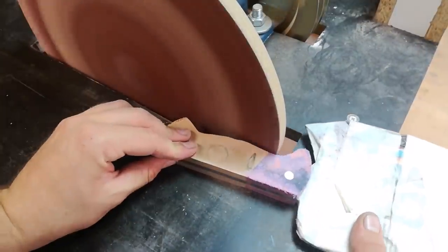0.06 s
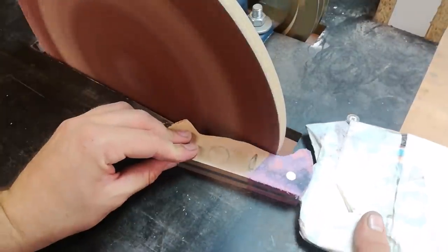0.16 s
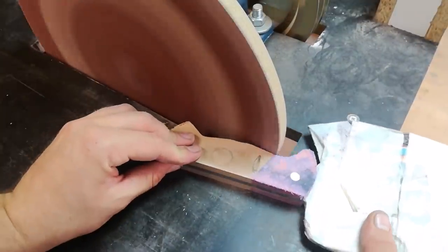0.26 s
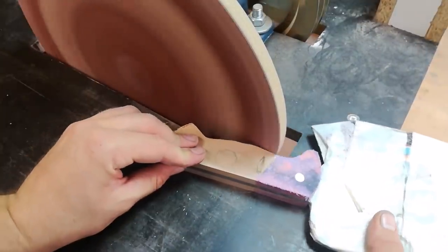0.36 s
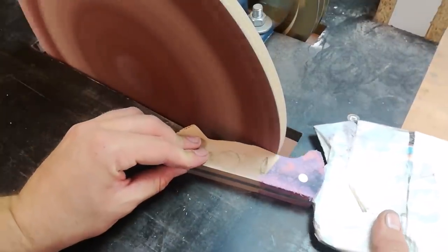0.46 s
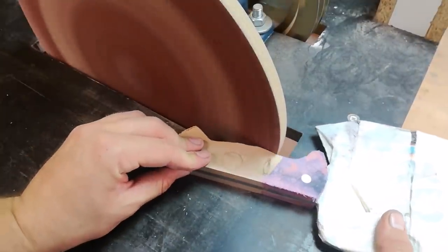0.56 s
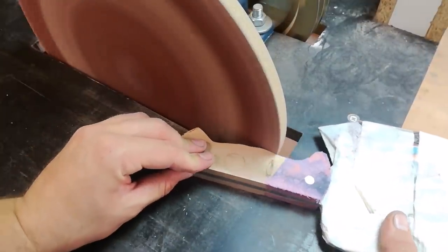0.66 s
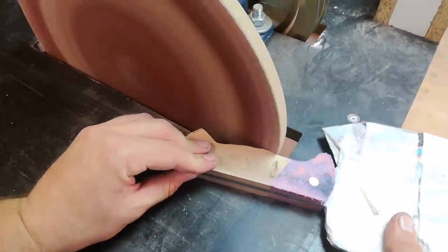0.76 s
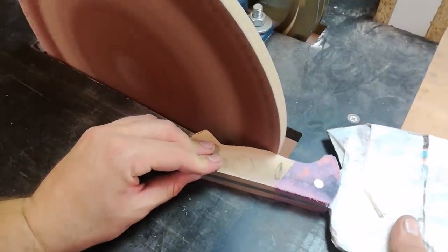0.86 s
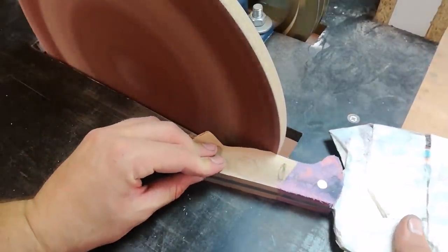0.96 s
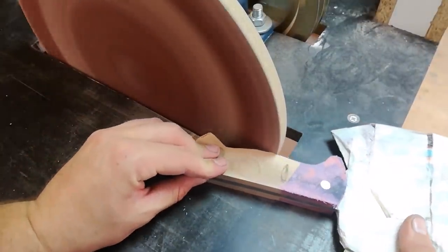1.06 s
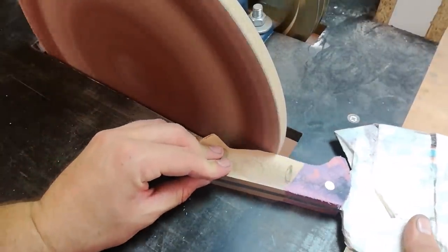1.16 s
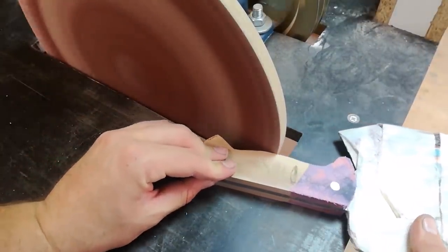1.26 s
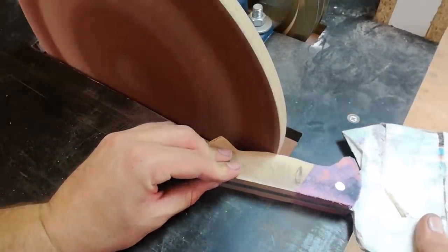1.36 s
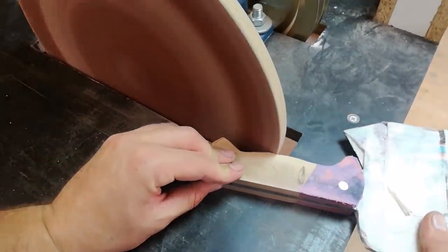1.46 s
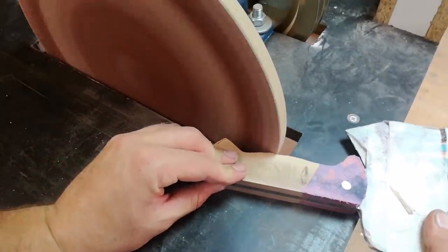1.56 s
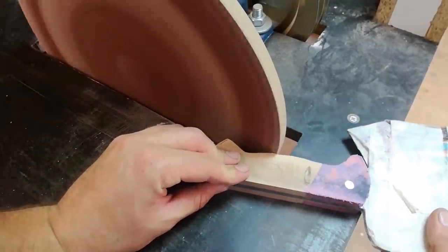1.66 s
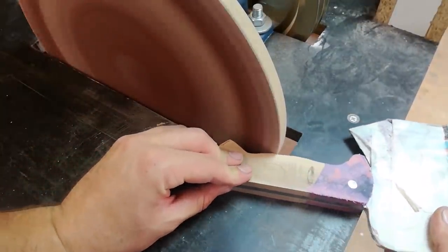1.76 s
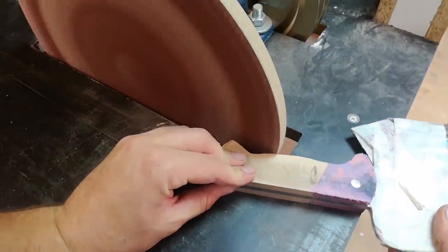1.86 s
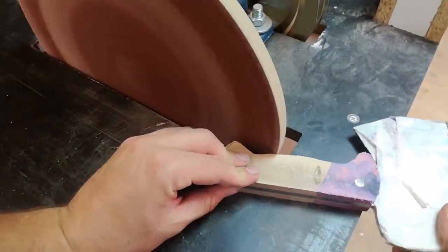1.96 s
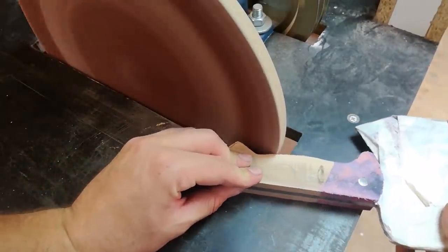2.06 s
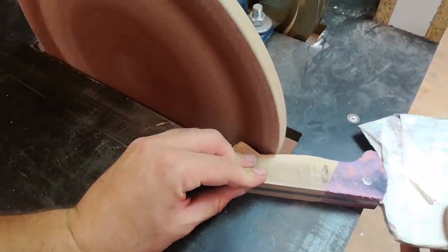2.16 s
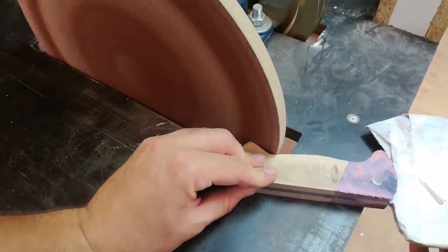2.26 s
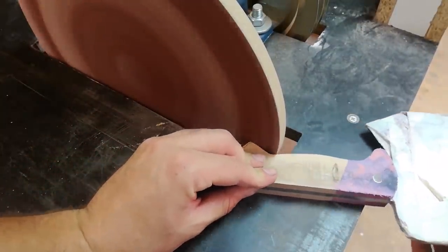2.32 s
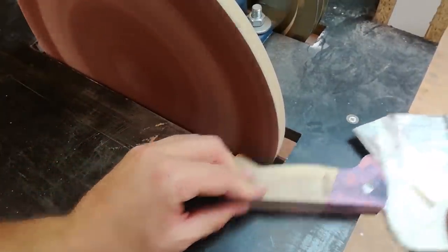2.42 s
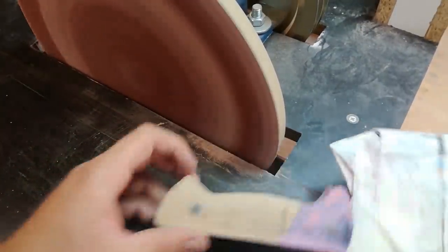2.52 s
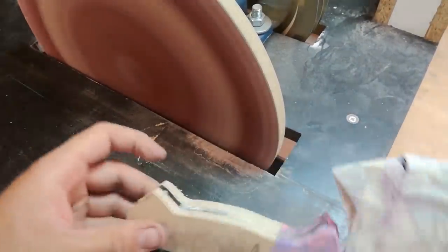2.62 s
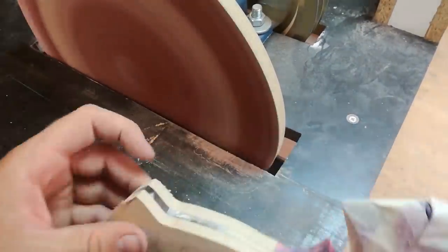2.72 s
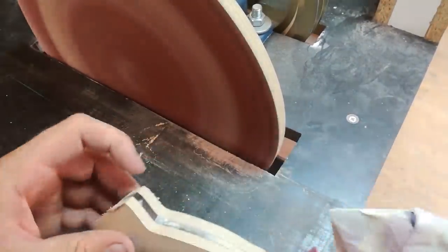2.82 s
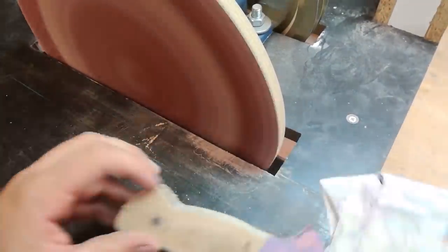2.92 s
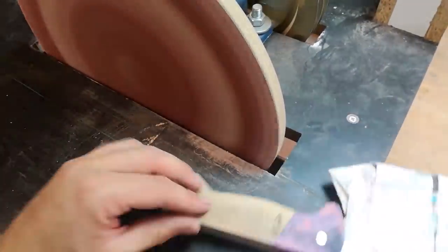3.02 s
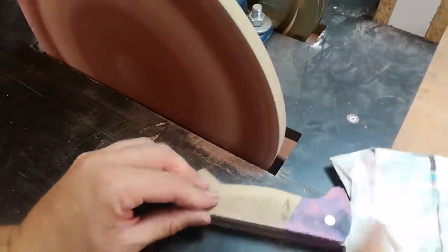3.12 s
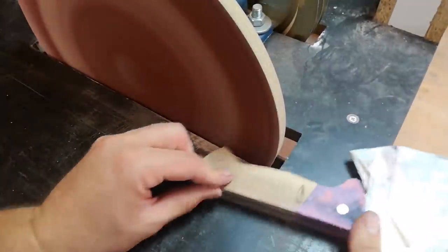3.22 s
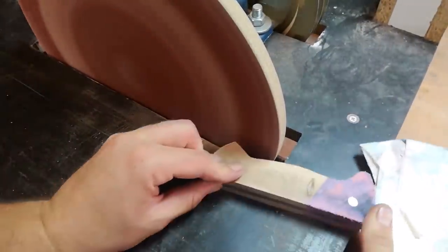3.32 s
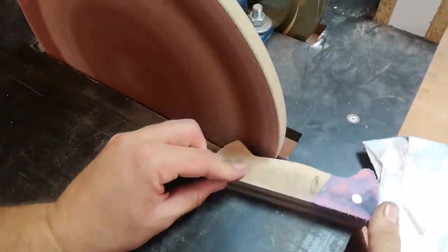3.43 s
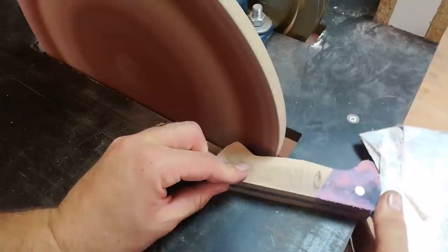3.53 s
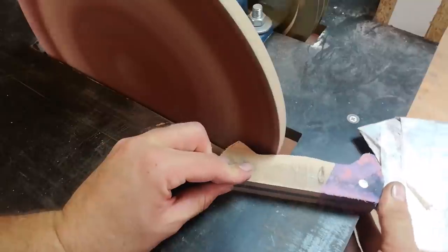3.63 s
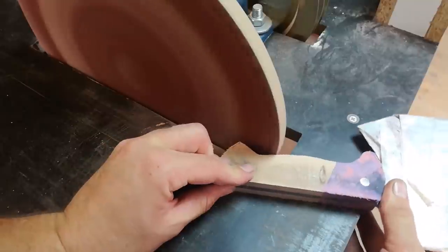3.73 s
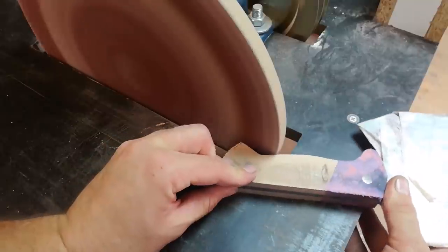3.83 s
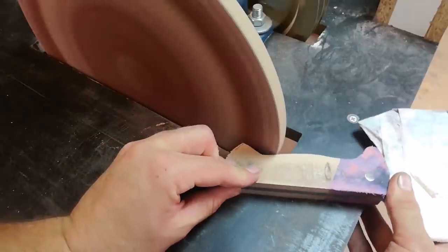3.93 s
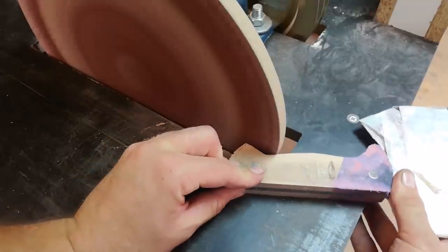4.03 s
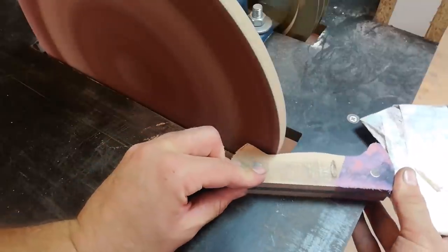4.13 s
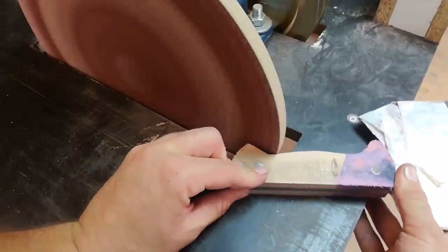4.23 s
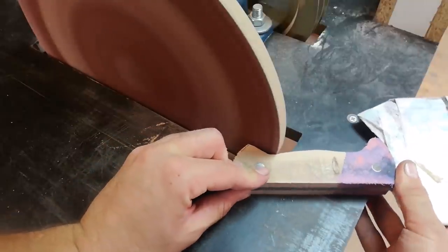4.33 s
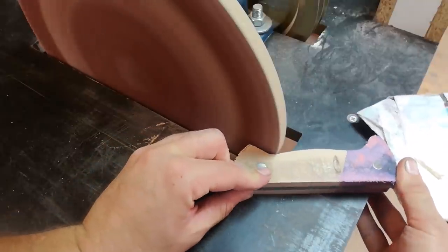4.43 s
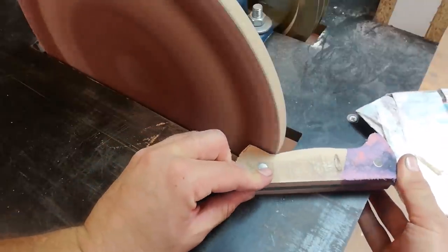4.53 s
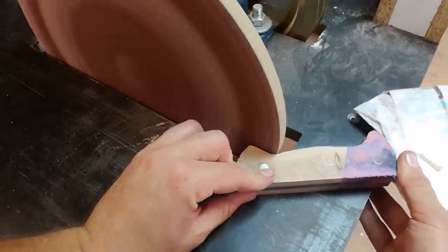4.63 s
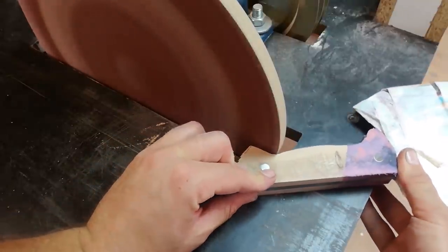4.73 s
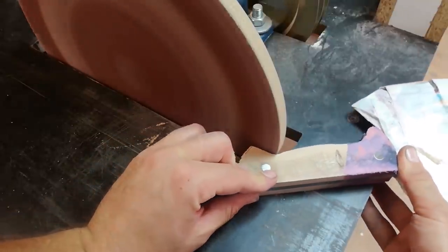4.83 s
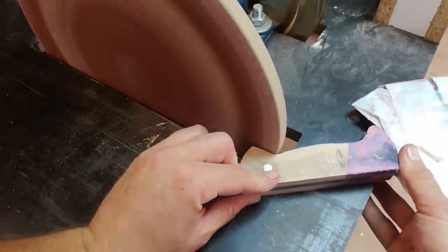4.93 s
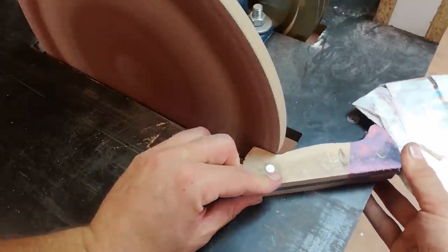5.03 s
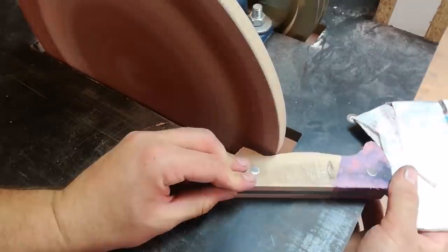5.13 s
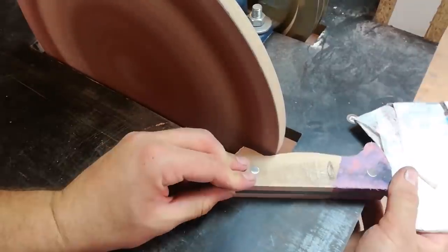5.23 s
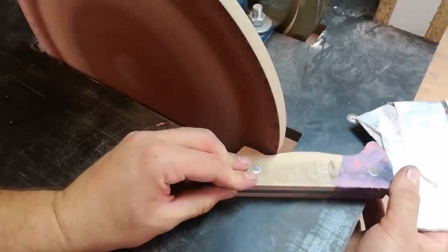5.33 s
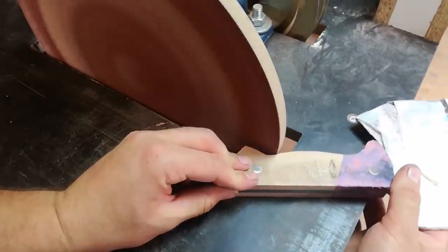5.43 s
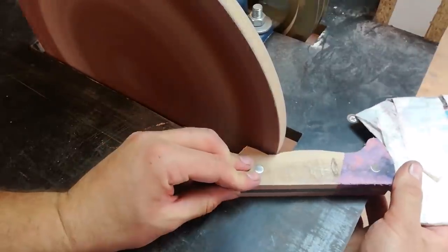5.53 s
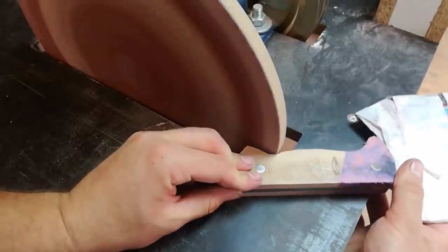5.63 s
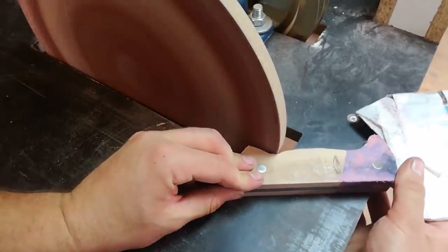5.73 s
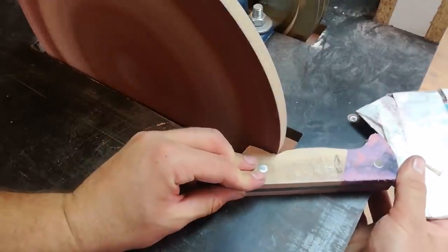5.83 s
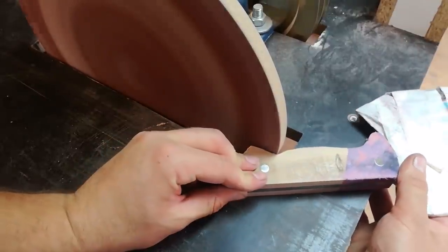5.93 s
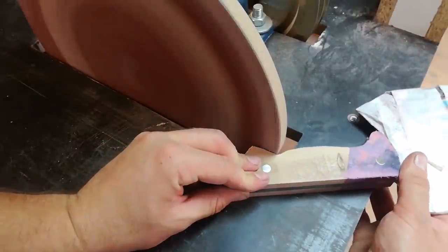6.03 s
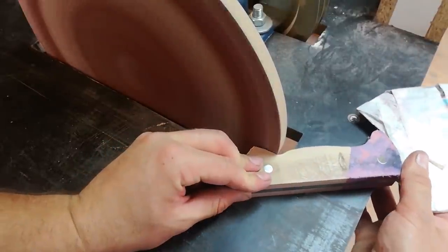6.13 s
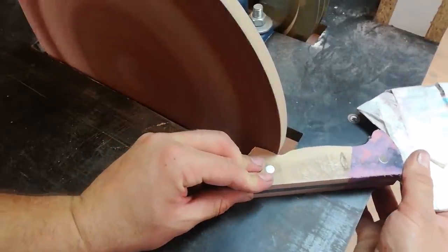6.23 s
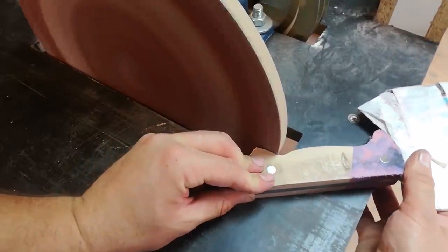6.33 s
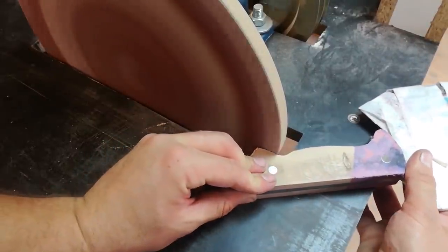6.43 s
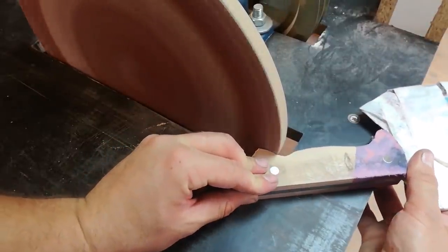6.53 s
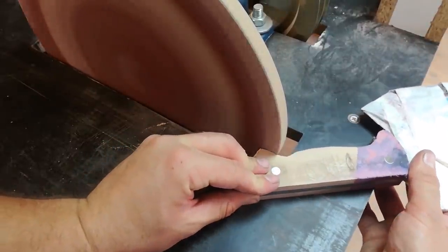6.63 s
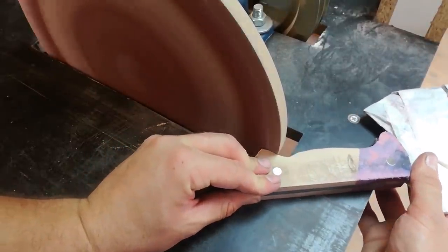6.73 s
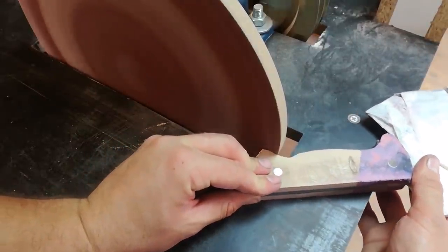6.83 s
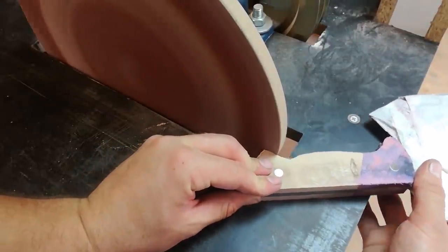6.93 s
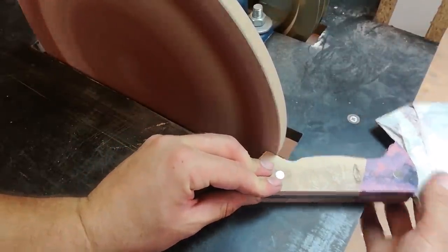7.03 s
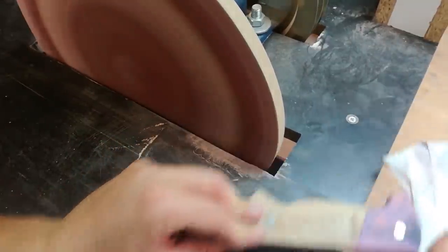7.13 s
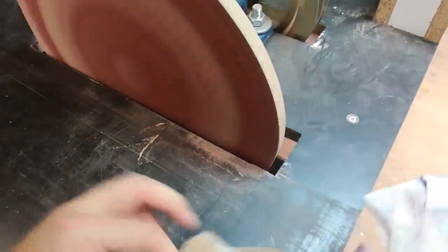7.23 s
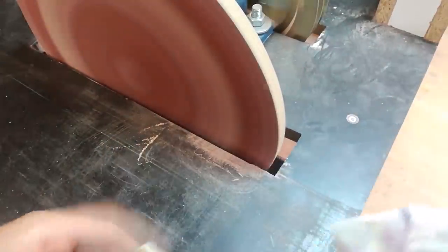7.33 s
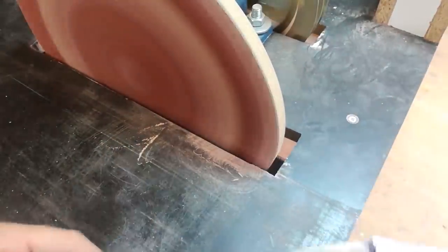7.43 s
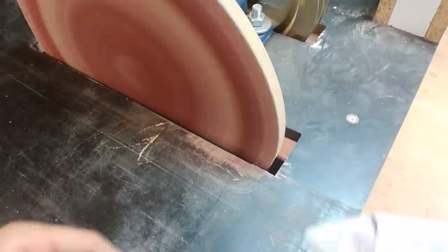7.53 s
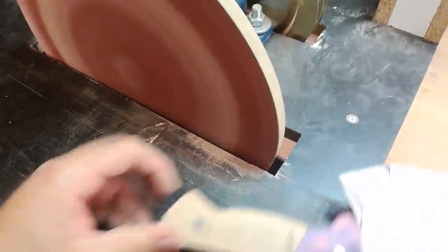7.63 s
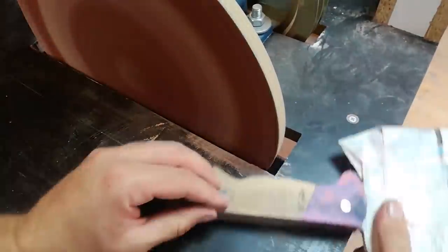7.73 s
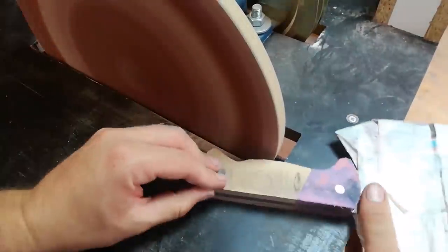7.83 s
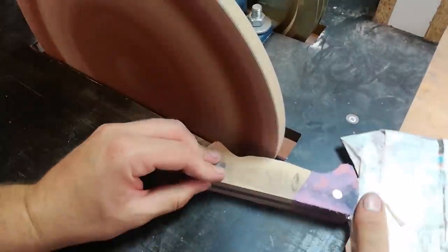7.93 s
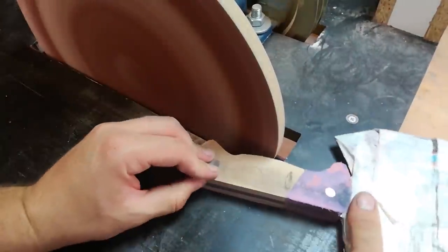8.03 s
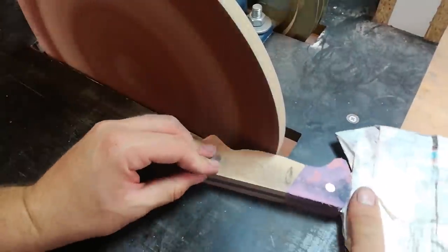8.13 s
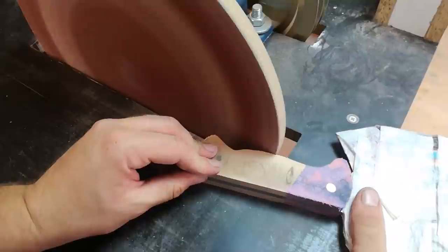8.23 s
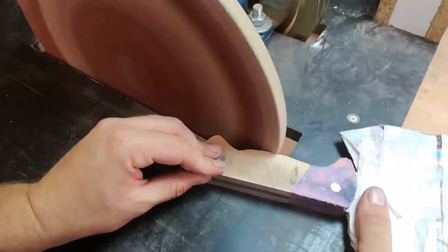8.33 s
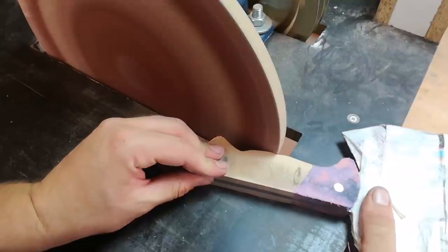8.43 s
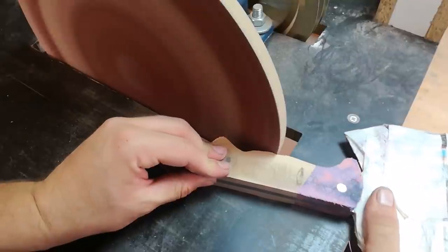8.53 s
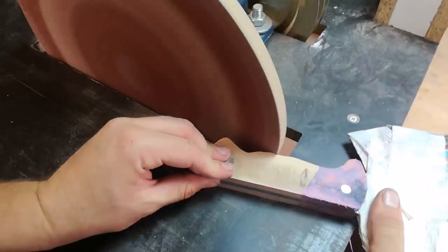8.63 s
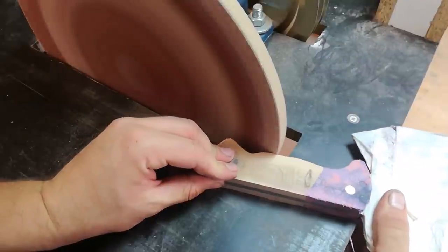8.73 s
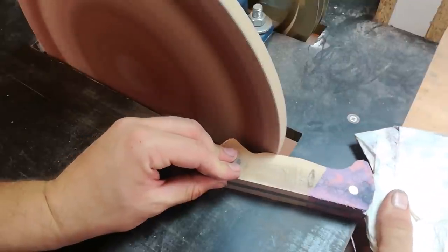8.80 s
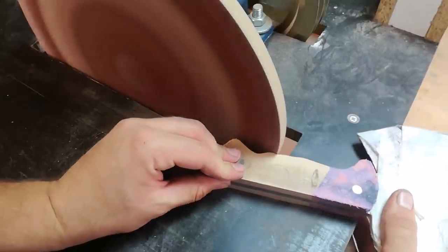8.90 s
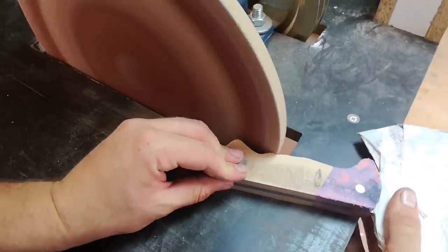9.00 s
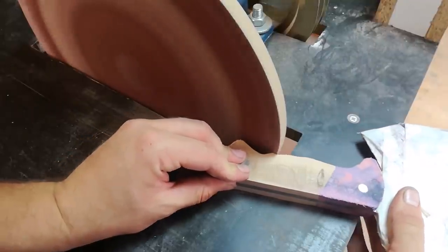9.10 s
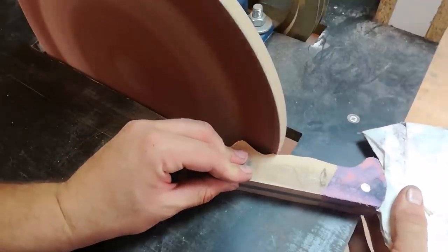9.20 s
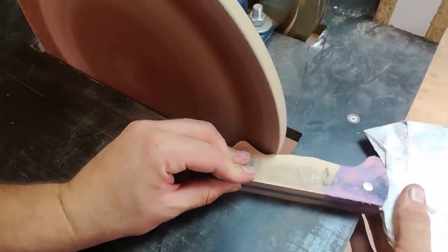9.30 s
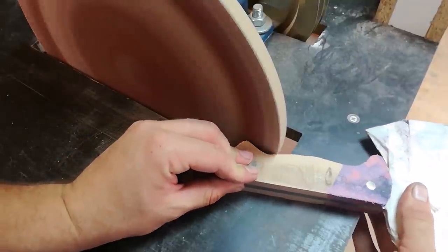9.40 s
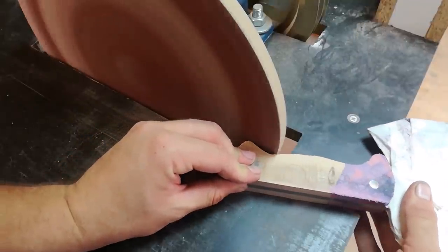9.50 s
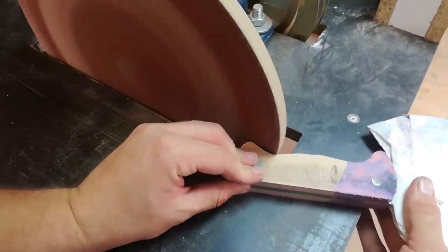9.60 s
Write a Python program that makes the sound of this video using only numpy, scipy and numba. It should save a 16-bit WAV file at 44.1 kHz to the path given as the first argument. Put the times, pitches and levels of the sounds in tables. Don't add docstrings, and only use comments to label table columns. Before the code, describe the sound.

Close workshop sanding: harsh abrasive hiss fluttering rapidly with the disc's turns, four presses on wood, light table knocks between, motor humming throughout.

```python
import sys
import numpy as np
from scipy import signal
from scipy.fft import rfft, irfft, next_fast_len
from scipy.io import wavfile
from numba import njit

SR = 44100
rng = np.random.default_rng(int(sys.argv[2]) if len(sys.argv) > 2 else 0)


def gain_from_db(level_db):
    decades = np.asarray(level_db, float) / 20
    return 10 ** decades


def generate_wav(signal):
    frames = np.transpose(np.atleast_2d(signal))
    scaled = np.clip(frames, -1, 1) * 32767
    pcm = np.round(scaled).astype(np.int16)
    wavfile.write(sys.argv[1], SR, pcm)


N = 426006
TIME = np.arange(N) / SR
SIZE = next_fast_len(N + 8192)
HZ = np.maximum(np.arange(SIZE // 2 + 1) * SR / SIZE, 1)
LOG_HZ = np.log(HZ)
LEFT_LAG_S = 14 / SR
LEFT_LAG = np.exp(-2j * np.pi * HZ * LEFT_LAG_S)
SMALL_BODY = np.minimum(HZ / 330, 1) ** 5
SCENE_CHANGE_S = 5.203

# (from [s], to [s])
PASSES = [
    (0.05, 2.4),
    (3.6, 5.09),
    (5.26, 7.08),
    (8.1, 9.7),
]
# (time [s], pressure on the disc [dB], seating on the table [dB])
HANDS = [
    [(.05, -16, -32), (.095, 0.5, 4), (.135, -14, -15), (.16, -2.5, -1), (.28, -1, 0.5), (1.67, -0.5, -1),
     (2.2, -1.5, -3), (2.34, -8.5, -2), (2.4, -16, -13)],
    [(3.6, -11, -33), (3.73, -0.5, -7), (3.9, -7, -5.5), (4.1, -9, -7.5), (4.26, -0.5, -8.5),
     (4.64, -3.5, -7.5), (4.8, -1.5, -8), (5.06, -5.5, -9), (5.09, -26, -9)],
    [(5.26, -18, -19), (5.4, -12, -20), (5.55, -7.5, -11.5), (5.72, 1, -7.5), (6.1, 2.5, -6),
     (6.57, 3, -4.5), (6.82, 1.5, -6), (7.02, 4, -7), (7.08, -15, 5)],
    [(8.1, -23, -11), (8.13, -16, -22), (8.215, -12, -16), (8.235, -1, -1), (8.3, 2.5, -1), (8.62, 4.5, 4),
     (9.35, 3.5, -1), (9.66, 3.5, -2.5)],
]
CREEP = [(.06, -.11, -.52, -.51), (-.05, .04, .4, .42), (.1, .27, -.08, -.46), (-.05, -.04, .54, .45)]
# (frequency [Hz], level [dB per Hz])
HISS = [(2470, -36), (4200, -5.5), (4510, -8.5), (5730, -8), (7640, -2.5), (8680, -4), (10800, -7.5),
        (15100, -11), (15800, -23)]
# (frequency [Hz], level [dB])
SHADOW = [(60, -6), (180, 9), (550, -2.5), (1650, -6.5), (4970, -7.5), (15000, -20)]
# (frequency [Hz], common share [0-1])
LIKENESS = [(60, 0.57), (450, 0.79), (1000, 0.85), (2300, 0.25), (5800, 0.15), (7200, 0.37), (8800, 0.14),
            (15000, 0.15)]


def rms_one(x):
    return x / np.sqrt(np.mean(np.mean(np.atleast_2d(x), axis=0) ** 2) + 1e-20)


def in_time(rows):
    s, *columns = np.transpose(rows)
    return [np.interp(TIME, s, c) for c in columns]


def by_pass(starts, ends=None):
    ends = starts if ends is None else ends
    return np.interp(TIME, np.ravel(PASSES), np.ravel(np.transpose([starts, ends])))


def spells(rows, attack_s, release_s):
    return [np.clip(np.minimum((TIME - a) / attack_s + 1, (b - TIME) / release_s + 1), 0, 1)
            for a, b, *rest in rows]


def song(rows):
    shapes = spells(rows, attack_s=0.23, release_s=0.1)
    return sum(gain_from_db(row[2]) * shape ** 2 for row, shape in zip(rows, shapes))


def at_hz(points):
    hz, value = np.transpose(points)
    return np.interp(LOG_HZ, np.log(hz), value)


def boosts(table):
    return gain_from_db(sum(db / (1 + (2 * (HZ - hz) / width) ** 2) for hz, width, db in table))


def resonance(hz, width_hz):
    return 1 / (1 + 1j * (HZ ** 2 - hz ** 2) / (HZ * width_hz))


def modes(table):
    return sum((-1) ** k * gain_from_db(db) * resonance(hz, width) for k, (hz, width, db) in enumerate(table))


def band(low_hz, high_hz, x):
    return signal.sosfilt(signal.butter(2, [low_hz, high_hz], "band", fs=SR, output="sos"), x)


@njit
def sweep(x, hz, width_hz, sr):
    out = np.zeros_like(x)
    r = np.exp(-np.pi * width_hz / sr)
    for c in range(x.shape[0]):
        for i in range(2, x.shape[1]):
            push = (1 - r * r) / 2 * (x[c, i] - x[c, i - 2])
            swing = 2 * r * np.cos(2 * np.pi * hz[i] / sr) * out[c, i - 1]
            out[c, i] = push + swing - r * r * out[c, i - 2]
    return out


def heard(pair, response, likeness=LIKENESS, shadow=SHADOW):
    # (frequency [Hz], width [Hz], boost [dB])
    left_port = [(3160, 750, 2.5), (4400, 720, -4.5), (6100, 700, 2.5), (7300, 600, -2.5), (8500, 920, 3),
                 (9500, 300, -5), (1820, 400, 1)]
    near, other = rfft(pair, SIZE) * response
    alike = np.clip(at_hz(likeness), 0, 1)
    left = alike * near * LEFT_LAG + np.sqrt(1 - alike ** 2) * other
    left = left * gain_from_db(at_hz(shadow)) * boosts(left_port)
    return rms_one(irfft([left, near], SIZE)[:, :N])


def motor():
    # (time [s], level [dB])
    drift = [(0, -51.5), (2.4, -52.5), (5.15, -51.5), (5.24, -52.5), (7.1, -48.5), (9.66, -46.5)]
    # (frequency [Hz], level [dB per Hz])
    fan_noise = [(35, -33), (60, -36), (91, -48), (329, -10.5), (361, -19.5), (436, -4.5), (590, -10),
                 (985, -14.5), (2230, -12.5), (4700, -19), (9460, -14.5), (15800, -25)]
    # (frequency [Hz], width [Hz], boost [dB])
    fan_peaks = [(9470, 410, 6), (5600, 2900, 5.5), (527, 31, -6.5), (103.4, 58, 22.5), (150, 39, 6.5),
                 (4100, 2200, -5.5), (3016, 52, 6.5), (8160, 1040, -4), (10870, 510, -5), (1900, 310, 1.5),
                 (3570, 120, -6), (4530, 180, -2)]
    # (frequency [Hz], level [dB])
    fan_shadow = [(60, 6.5), (180, -2.5), (550, -1), (1650, -4), (4970, -2.5), (15000, -13.5)]
    # (frequency [Hz], common share [0-1])
    fan_likeness = [(60, 0.5), (400, 1), (1500, 0.32), (4500, 0.073), (8000, 0.074), (15000, .05)]
    # (frequency [Hz], level before [dB], after the scene changes [dB])
    hum_lines = [(100, -82, -85), (200, -79, -78), (499.6, -65, -64), (599.3, -69, -69), (699, -66, -64),
                 (800, -73, -72), (1857, -77, -80), (1999, -79, -79), (2316, -77, -80), (2616, -81, -83),
                 (2995, -76, -79), (3122, -80, -83), (4904, -83, -85), (5147, -81, -84), (5589, -81, -84),
                 (6982, -81, -84), (6190, -79, -74), (7508, -80, -76)]
    # (from [s], to [s], level [dB], frequency [Hz])
    resting = [(2.44, 2.9, -61, 599.3), (11, 4.1, -74, 499.6), (6.4, 7.7, -61.5, 602),
               (7.8, 8.2, -54.5, 496), (5.7, 8.6, -76, 100)]
    level_db, = in_time(drift)
    colour = gain_from_db(at_hz(fan_noise)) * boosts(fan_peaks)
    fan = heard(rng.standard_normal((2, N)), colour, fan_likeness, fan_shadow)

    waver = np.interp(TIME * 25, np.arange(250), rng.standard_normal(250))
    hum = np.zeros((2, N))
    for k, (hz, first_db, second_db) in enumerate(hum_lines):
        line_db = np.where(TIME < SCENE_CHANGE_S, first_db, second_db) + 3.5 * np.roll(waver, 9000 * k)
        start_turns = rng.random((2, 1)) * 0.39
        hum += np.sqrt(2) * gain_from_db(line_db) * np.sin(2 * np.pi * (hz * TIME + start_turns))
    passed = sum(np.sqrt(2) * song([row]) * gain_from_db(2.5 * waver) * np.sin(2 * np.pi * row[3] * TIME)
                 for row in resting)

    away_s = abs(TIME - SCENE_CHANGE_S)
    fan_fade = np.clip(away_s / 0.028, .01, 1) ** 3.1
    hum_fade = np.clip(away_s / .035, 0, 1)
    return fan_fade * gain_from_db(level_db) * fan + hum_fade * hum + passed


def knocks():
    # (time [s], peak [dB])
    set_down = [
        (3.011, -30.5),
        (7.723, -23),
    ]
    # (frequency [Hz], level [dB], time to fall 60 dB [s])
    table_modes = [(342, -30, 0.13), (374, -6.5, 0.14), (457, -9, 0.12), (597, -19, 0.035), (745, -11, .05),
                   (872, -2, 0.1), (1047, -15, 0.098), (1890, -7, .06), (2030, -12, 0.08),
                   (2120, -19, 0.05), (2730, -18, 0.081)]
    out = np.zeros(N)
    for hz, level_db, t60 in table_modes:
        r, w = gain_from_db(-60 / (min(t60, .1) * SR)), 2 * np.pi * hz / SR
        blows = np.full(N, 1e-18)
        for s, db in set_down:
            contact_db = np.array([-3, 0, -7]) + rng.normal(0, 0.63, 3)
            blows[round(s * SR) + np.array([0, 90, 310])] = gain_from_db(db + level_db - 13.5 + contact_db)
        out += signal.lfilter([0, np.sin(w)], [1, -2 * r * np.cos(w), r * r], blows)
    thud = sum(gain_from_db(db - 12.0) * (TIME > s) * np.exp(-np.clip(TIME - s, 0, 1) / 0.0063)
               for s, db in set_down)
    dense_wood = band(250.0, 1600.0, band(220.0, 1500.0, rng.standard_normal(N)))
    out += thud * rms_one(dense_wood)
    out = signal.sosfilt(signal.butter(2, 280., "high", fs=SR, output="sos"), out)
    return np.array([gain_from_db(4.0) * np.roll(out, round(LEFT_LAG_S * SR)), gain_from_db(8.5) * out])


def disc_turns():
    # (time [s], speed [turns per s])
    spin = [(0, 27.73), (2.5, 27.83), (5.2, 27.74), (8.0, 27.77), (9.7, 27.77)]
    s, speed = np.transpose(spin)
    return np.interp(TIME, s, np.concatenate([[0], np.cumsum(np.diff(s) * speed[:-1])]))


def scuffs():
    # (time [s], peak [dB])
    touches = [(0.056, -29.5), (0.0743, -25), (0.127, -24.5), (2.043, -19), (3.6142, -39), (5.2808, -35),
               (5.3178, -39), (5.3544, -37), (5.4251, -38), (6.826, -22.5), (8.122, -25.5), (8.158, -25.5),
               (8.194, -33), (4.7925, -26), (4.834, -27), (2.25, -29), (5.677, -37), (4.971, -28),
               (8.224, -23)]
    # (frequency [Hz], width [Hz], level [dB])
    tick_modes = [(9380, 170, 12), (8560, 150, 3), (7020, 260, 6)]
    starts = np.full(N, 1e-18)
    starts[[round(s * SR) for s, db in touches]] = gain_from_db(np.array(touches)[:, 1] - 9)
    burst = signal.lfilter([1], [1, -np.exp(-1 / (0.0045 * SR))], starts)
    noise = rng.standard_normal((2, N))
    hiss = SMALL_BODY * gain_from_db(at_hz(HISS))
    bright = 1.5 * abs(resonance(8300, 1500))
    body = 0.05 * SMALL_BODY * abs(resonance(2500, 4000))
    glance = heard(noise, hiss + bright + body)

    tick_db = -37.5 + 2.6 * np.minimum(in_time(HANDS[1])[0] + 2.3, 0)
    away = (disc_turns() - 0.51 + .5) % 1 - .5
    spit = gain_from_db(tick_db + 3.0) * np.exp(-(away / 0.051) ** 2) * (TIME > 3.62) * (TIME < 4.85)
    click = (np.diff(away, prepend=0) > 0) * (abs(away) < 14 / SR)
    strike = spit * (noise + 12.0 * click)
    return burst * glance + np.std(spit) * heard(strike, 0.51 * hiss + modes(tick_modes))


def surface(turns, count, memory):
    keep = np.clip(memory, 0, .99)
    fresh = rng.standard_normal((2, int(turns[-1]) + 41, count))
    rings = signal.lfilter([np.sqrt(1 - keep ** 2)], [1, -keep], fresh, axis=1)
    rings = rings[:, 40:].reshape(2, -1)
    return np.array([np.interp(turns * count, np.arange(ring.size), ring) for ring in rings])


def grit(turns, memory, fresh_share):
    return surface(turns, count=800, memory=memory) + fresh_share * rng.standard_normal((2, N))


def paper_bands(turns):
    # (from [s], to [s], angle [turns], width [turns], level [dB])
    bands = [(0.13, 0.898, 0.54, 0.035, 2), (0.61, 1.65, 0.275, 0.0067, 4), (0.35, 1.6, 0.88, 0.047, 1.5),
             (0.27, 1.2, 0.9, 0.03, 2), (1.3, 2.2, 0.21, 0.014, -1), (1.6, 1.7, 1, 0.036, 1),
             (4, 4.848, 0.033, 0.014, 7), (4.25, 4.895, 0.22, 0.032, 5), (4.7, 4.7, 0.21, 0.064, 0.5),
             (5.3, 5.8, 0.816, 0.03, 4.5), (5.9, 6.8, 0.94, 0.029, 3.5), (6.198, 7.05, 0.53, 0.046, 0),
             (6.82, 6.986, 0.79, 0.076, 4), (5.65, 4.5, .5, 0.037, 0.5), (6.82, 7.0, 0.088, .07, -2),
             (8.246, 9.5, 0.61, 0.018, 1.5), (8.25, 9.5, 0.44, 0.02, -0.5), (8.25, 9.4, 0.345, 0.027, -2.5),
             (9.2, 9.4, 0.2, 0.016, 0), (12, 9.5, 0.77, 0.017, 3), (9.9, 9.3, 0.91, 0.043, 1.5),
             (5.9, 6.1, 0.94, 0.036, 0), (6.15, 6.85, 0.12, 0.056, 3.5), (6.1, 6.85, 0.92, .05, -2),
             (4.85, 5.08, 0.4, .06, 3), (4.85, 6.2, .58, .05, -3), (3.6, 3.5, .13, .016, -1),
             (4.4, 4.85, .42, .05, -3), (8.25, 8.5, .33, .03, 1.5), (8.9, 8.5, .6, .05, -2),
             (6.86, 8.1, 0.315, .025, 3.5)]
    # (from [s], to [s], angle [turns], fade [turns], level [dB])
    catch = (5.8, 6.09, .455, .13, 7.5)
    a, b, angle, fade, db = catch
    total_db = db * spells([catch], .15, .1)[0] * (np.exp(-((turns - angle) % 1) / fade) - fade)
    for (a, b, angle, width, db), shape in zip(bands, spells(bands, 0.078, 0.026)):
        away = (turns - angle + .5) % 1 - .5
        total_db = total_db + db * shape * np.exp(-(away / width) ** 2)
    return total_db


def throb(turns):
    # (time [s], angle [turns], depth [dB], twice-a-turn depth [dB])
    wobble = [(.1, -.5, 4.3, 2), (.55, -.71, 3.1, 1.7), (1.2, -.67, 3.5, 1), (1.8, -.67, .7, .9),
              (2.15, -.58, 3.2, 1), (3.65, .46, 5.5, 1.9), (3.85, .28, 2.6, .9), (4.05, .3, 3, 1.3),
              (4.45, .58, 1.2, 2.8), (4.68, .48, 1.4, 2.6), (4.85, .35, 5, .5), (5.1, .27, 3.4, .8),
              (5.45, -.25, 3.2, 1.5), (6.0, -.37, 6.2, .9), (6.6, -.5, 1.8, 2.1), (6.9, -.42, 3.6, 2.6),
              (8.33, -.57, 5.5, .9), (8.62, -.65, 3.1, 1.6)]
    spot, spot_db, second_db = in_time(wobble)
    second = by_pass(*np.transpose(CREEP)[:2])
    wobble_db = spot_db * np.cos(2 * np.pi * (turns - spot))
    wobble_db += second_db * np.cos(4 * np.pi * (turns - second))
    reach_db = np.hypot(spot_db, second_db)
    return reach_db * np.tanh(1.05 * wobble_db / reach_db) + paper_bands(turns)


def bench_rumble(turns):
    # (order [per turn], level [dB])
    rumble_orders = [(3, -9), (4, -2)]
    # (from [s], to [s], level [dB])
    rumble_spells = [(.3, 2.4, -70), (4.2, 5, -80), (5.8, 7.0, -64), (8.4, 11.2, -68)]
    shake = sum(gain_from_db(db) * np.sin(2 * np.pi * order * turns) for order, db in rumble_orders)
    loose = rms_one([[1, 0.19], [1, -.25]] @ band(89.0, 124.0, rng.standard_normal((2, N))))
    return song(rumble_spells) * rms_one(shake + .35 * loose)


def table_drone(turns, centre_hz):
    # (frequency [Hz], width [Hz], level [dB])
    loose_modes = [(304, 31, 13), (444, 25, 53)]
    widths = [28.4, 31.6, 31.2, 28]
    skirts = [-64, -30, -22.5, -56]
    wavers = [.7, 1.8, 2.5, 1.4]
    spot = by_pass(*np.transpose(CREEP)[2:])
    wander = np.concatenate([surface(turns, count=1, memory=0.68) for k in range(5)]) * by_pass(wavers)
    skirt, width = gain_from_db(by_pass(skirts)), by_pass(widths)
    orders = np.zeros(N)
    for k in range(11, 21):
        gain = np.exp(-((k * 27.53 - centre_hz) / width) ** 2) + skirt * (k < 17)
        angle = 2 * np.pi * (k * turns - (k - 17) * spot) + .08 * wander[20 - k]
        orders += gain * gain_from_db(wander[k - 11]) * np.cos(angle)
    tone = orders * gain_from_db(0.51 * surface(turns, count=2, memory=0.26)[0])
    colour = modes(loose_modes) * resonance(390, 460) * np.minimum(HZ / 290, 1) ** 6
    loose = heard(rng.standard_normal((2, N)), colour)
    return rms_one([np.roll(tone, round(LEFT_LAG_S * SR)), tone] + .16 * loose)


def grit_lines(turns):
    # (order [per turn], level over the rasp [dB])
    grit_orders = [(33, -11), (37, -12), (38, -13), (41, -12), (49, -14), (55, -16)]
    lines_db = [-0.5, -1, 0, 3.5]
    wander = np.concatenate([surface(turns, count=1, memory=0.8) for k in range(3)])
    tone = sum(gain_from_db(db + 3.3 * slow) * np.sin(2 * np.pi * order * turns + 0.37 * slow)
               for (order, db), slow in zip(grit_orders, wander))
    pair = np.array([gain_from_db(-4.0) * np.roll(tone, round(LEFT_LAG_S * SR)), tone])
    return gain_from_db(by_pass(lines_db) + 3.0) * pair


def rasp_and_scratch(fine, throb_db, ridges_db):
    # (frequency [Hz], width [Hz], boost [dB])
    wood = [(898, 31, 6.5), (1079, 120, 6.5), (1318, 45, 7.5), (1510, 60, 1), (1756, 82, 3.5),
            (1980, 140, 4.5), (2630, 170, -8), (2950, 100, -3), (3460, 190, 1.5), (3500, 120, 0.5),
            (4360, 120, -12), (4720, 150, -9)]
    # (frequency [Hz], level [dB per Hz])
    rasp_tone = [(310, -9.5), (520, 2.5), (635, -3.5), (890, 1), (1450, -2), (1990, -5.5), (2200, -4.5),
                 (2860, -9), (4840, -120)]
    # (frequency [Hz], level [dB per Hz])
    scratch_tone = [(1240, -19.5), (2100, -10), (2520, -3.5), (3500, -5.5), (4030, -5), (4400, -6.5),
                    (5720, -5), (9680, -120)]
    handle = SMALL_BODY * boosts(wood)
    rasp = heard(gain_from_db(.5 * throb_db + 1.7 * ridges_db[1]) * fine, handle * gain_from_db(at_hz(rasp_tone)))
    scratch = heard(gain_from_db(0.54 * throb_db + 2.0 * ridges_db[0]) * fine, handle * gain_from_db(at_hz(scratch_tone)))
    return rasp, scratch


def disc_rings(turns, fine, throb_db, press_db):
    # (frequency [Hz], width [Hz])
    low_mode, high_mode = [(2053, 85), (4050, 120)]
    # (frequency [Hz], width [Hz], level [dB])
    low_rim = [(1870, 210, -9), (2000, 127, -36)]
    # (frequency [Hz], width [Hz], level [dB])
    high_rim = [(3920, 120, -3.5), (4190, 150, -8)]
    # (from [s], to [s], level [dB])
    low_song = [(.3, .9, -51.5), (.9, 1.85, -50.5), (5.8, 6.1, -51), (6.15, 6.8, -46.5), (8.4, 9.5, -55)]
    # (from [s], to [s], level [dB])
    high_song = [(1.25, 2.2, -53.5), (3.7, 3.82, -59), (4.3, 4.5, -62), (4.85, 5.02, -58), (5.85, 6.1, -65),
                 (6.2, 6.5, -58), (6.6, 6.8, -84), (6.9, 7.0, -57), (8.4, 8.55, -52), (8.7, 9.0, -51),
                 (9.15, 9.45, -48.5)]

    def ring(mode, rim, order):
        drive = fine + .12 * np.sin(2 * np.pi * order * turns)
        return heard(gain_from_db(1.8 * throb_db) * drive, resonance(*mode) * resonance(mode[0], 1300.0) + modes(rim))

    low_gain = song(low_song) * gain_from_db(-5.0) + gain_from_db(-68.5 + press_db)
    high_gain = song(high_song) * gain_from_db(0.5) + gain_from_db(-67 + press_db)
    return low_gain * ring(low_mode, low_rim, 74) + high_gain * ring(high_mode, high_rim, 146)


def edge_hiss(grains, throb_db, ridges_db, edge_hz):
    # (frequency [Hz], width [Hz], boost [dB])
    fine_peaks = [(4400, 170, -0.5), (4760, 200, 0), (5220, 47, 6.5), (7000, 36, 1.5), (6510, 60, 3),
                  (7160, 50, 3), (7490, 50, 2.5), (7712, 39, 1.5), (7930, 40, 3), (7480, 50, 3.5),
                  (7850, 46, 4.5), (9400, 140, 6), (10670, 1300, 5)]
    edge_db = [0.2, 3, -1.5, 0.6]
    edge = sweep(gain_from_db(0.98 * throb_db + 1.8 * ridges_db[1]) * grains, edge_hz, 640.0, SR)
    source = grains + 1.31 * gain_from_db(by_pass(edge_db)) * edge
    return heard(source, SMALL_BODY * gain_from_db(at_hz(HISS)) * boosts(fine_peaks))


def digging_corner(grains):
    # (frequency [Hz], width [Hz], level [dB])
    corner_modes = [(3040, 200, -1.5), (4150, 140, 8), (5320, 95, 0), (7160, 77, 6.5), (8900, 200, 2)]
    return heard(grains, modes(corner_modes))


def sanding():
    # (time [s], handle edge [Hz], table [Hz])
    grip_curves = [
        [(0.05, 7600, 495), (0.15, 7380, 482), (1.15, 7690, 478), (1.4, 7550, 466), (1.96, 7050, 462),
         (2.4, 6900, 452)],
        [(3.6, 7250, 452), (3.984, 6370, 457), (4.138, 7100, 459), (4.318, 7000, 458), (4.762, 6550, 457),
         (5.09, 6900, 440)],
        [(5.26, 6840, 460), (5.67, 7300, 474), (5.822, 7000, 457), (6.542, 7000, 452), (6.912, 6700, 450),
         (7.08, 7000, 450)],
        [(8.1, 7450, 467), (8.5, 7500, 479), (8.85, 7420, 464), (9.208, 7320, 465), (9.66, 6550, 466)],
    ]
    # (rasp [dB], scratch [dB])
    grips = [(-55, -53), (-51, -55), (-50, -49.5), (-48.5, -50.5)]
    # (time [s], hold [s], extra hiss [dB], extra rasp [dB], corner [dB])
    bites = [(0.147, 0.18, 0, 5.5, -58), (0.598, 0.74, 0.43, -1.5, -73), (2.018, 0.039, 1.5, 3, -68),
             (2.261, 0.016, 10, 14, -45), (3.647, 0.23, 1.1, -2.5, -64), (4.606, 0.29, 1.1, -0.5, -64),
             (4.827, 0.23, 1, 5.5, -54), (6.85, 0.13, 3, -0.5, -41), (8.22, 0.007, 3, 2, -56),
             (9.537, .15, 4, -0.5, -48)]
    turns = disc_turns()
    throb_db = throb(turns)
    ridges_db = surface(turns, count=36, memory=0.93)
    touching = sum((TIME > a) * np.clip((b - TIME) / 0.019, 0, 1) for a, b in PASSES)
    press_db, seat_db = in_time(np.concatenate(HANDS))
    edge_hz, drone_hz = in_time(np.concatenate(grip_curves))

    attack_s = 0.0053
    digs = spells([(s + attack_s, s + hold) for s, hold, *db in bites], attack_s, release_s=0.095)
    bite_db, bite_rasp_db = np.transpose(bites)[2:4] @ digs
    corner_gain = gain_from_db(np.transpose(bites)[4]) @ digs

    rasp_db, scratch_db = [by_pass(grip) for grip in np.transpose(grips)]
    rasp_db = rasp_db + 0.54 * press_db + bite_rasp_db
    scratch_db = scratch_db + 0.89 * press_db + 1.52 * bite_db

    fine = grit(turns, memory=0.902, fresh_share=1.0)
    grains = gain_from_db(1.02 * throb_db + 1.6 * ridges_db[0]) * rng.standard_normal((2, N))
    grains = grains * gain_from_db(rng.normal(0, 2.6, N))

    rasp, scratch = rasp_and_scratch(fine, throb_db, ridges_db)
    cut = gain_from_db(-43 + seat_db) * table_drone(turns, drone_hz)
    cut = cut + gain_from_db(rasp_db) * (rasp + grit_lines(turns)) + gain_from_db(scratch_db) * scratch
    cut += disc_rings(turns, fine, throb_db, press_db)
    cut += corner_gain * digging_corner(grains)
    cut += gain_from_db(-40.5 + press_db + bite_db) * edge_hiss(grains, throb_db, ridges_db, edge_hz)
    return touching * (cut + bench_rumble(turns))


def scene():
    return motor() + knocks() + scuffs() + sanding()


def top_cut(x):
    return signal.sosfilt(signal.butter(12, 16460, fs=SR, output="sos"), x)


def record(dry):
    thin = signal.sosfilt(signal.butter(2, 65., "high", fs=SR, output="sos"), dry)
    mix = signal.sosfilt(signal.cheby2(26, 60, 15960, fs=SR, output="sos"), thin)
    return top_cut(mix)


dry = scene()
out = record(dry)
generate_wav(out)
```